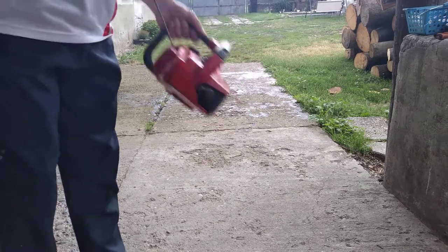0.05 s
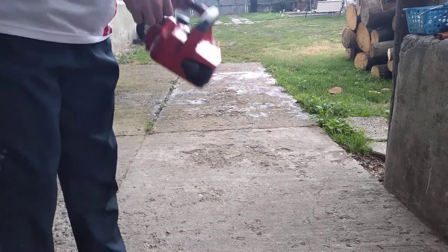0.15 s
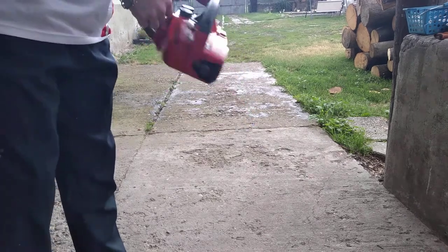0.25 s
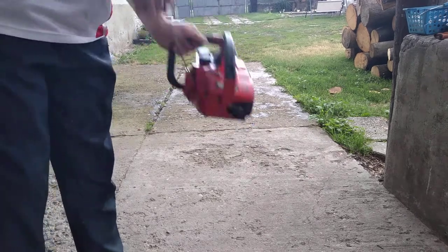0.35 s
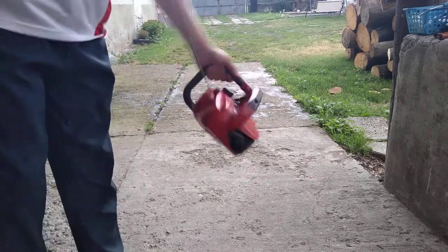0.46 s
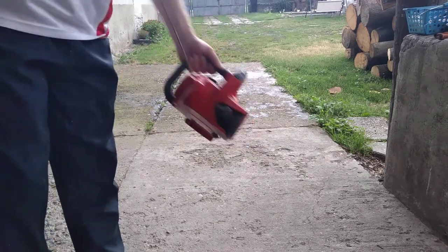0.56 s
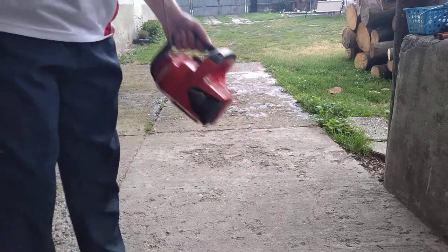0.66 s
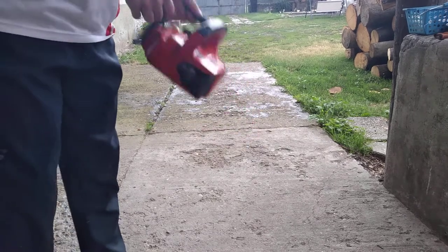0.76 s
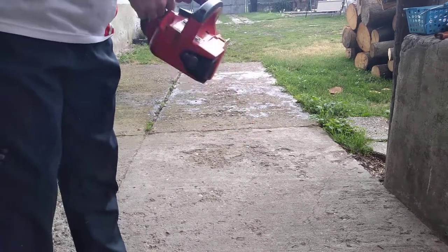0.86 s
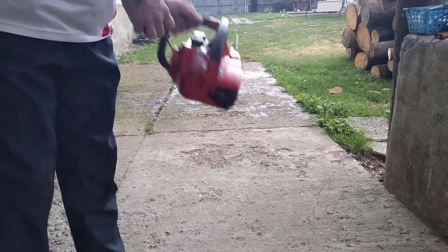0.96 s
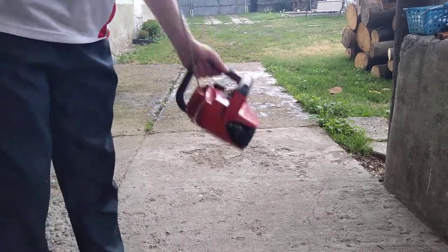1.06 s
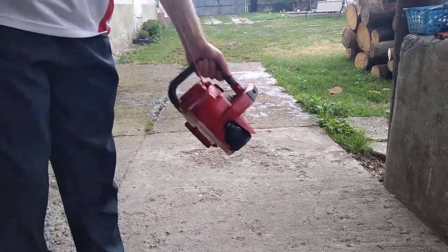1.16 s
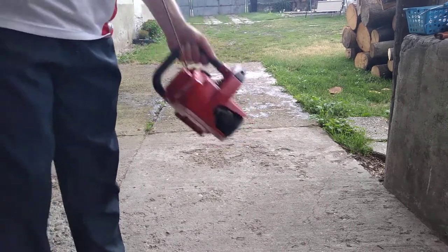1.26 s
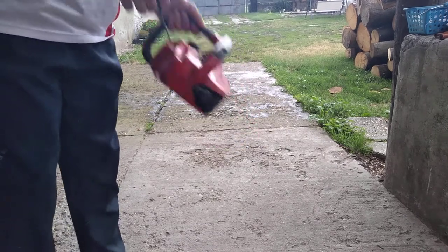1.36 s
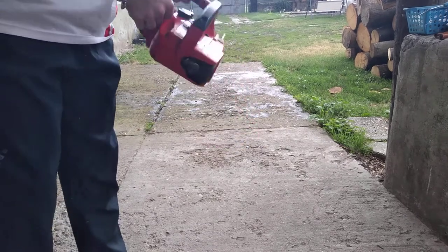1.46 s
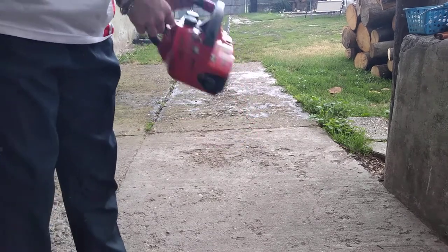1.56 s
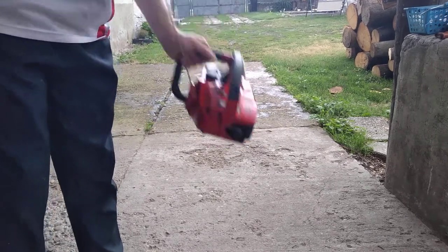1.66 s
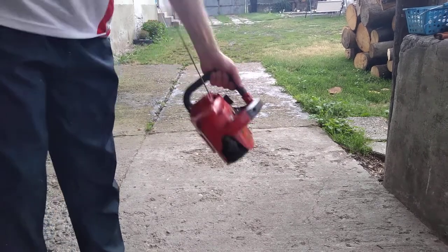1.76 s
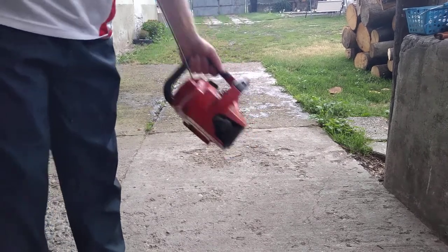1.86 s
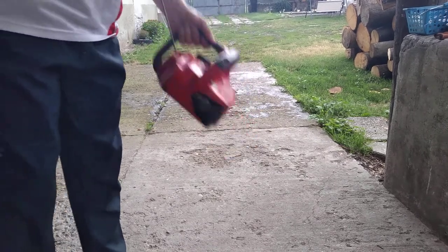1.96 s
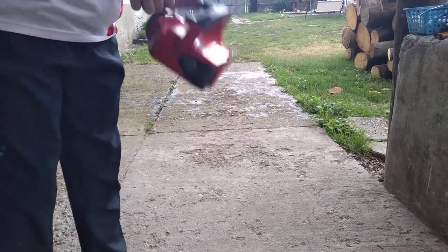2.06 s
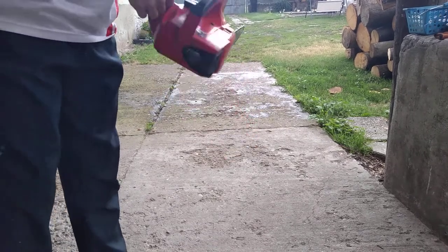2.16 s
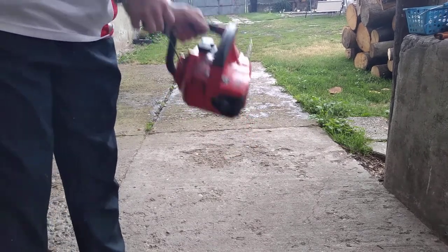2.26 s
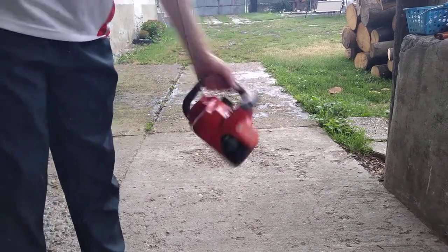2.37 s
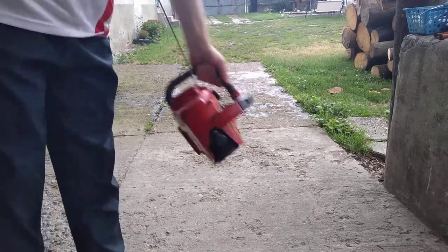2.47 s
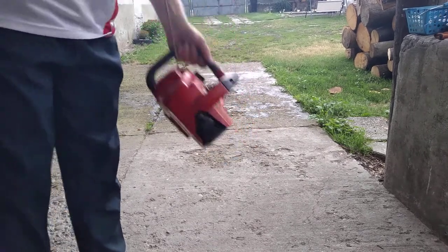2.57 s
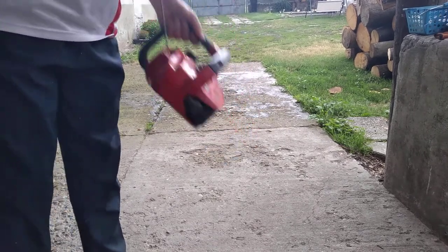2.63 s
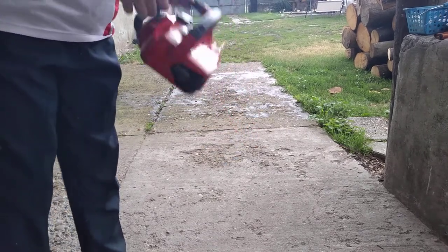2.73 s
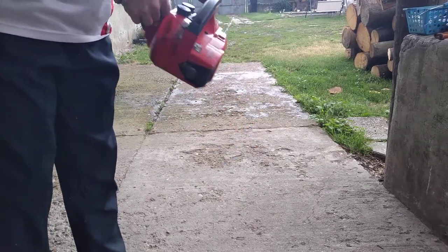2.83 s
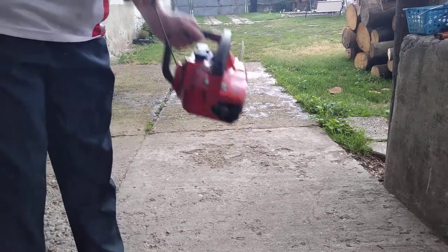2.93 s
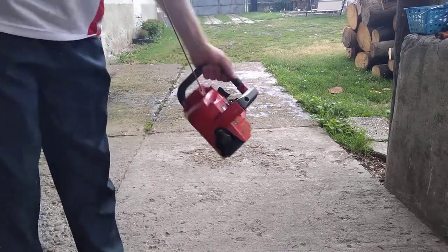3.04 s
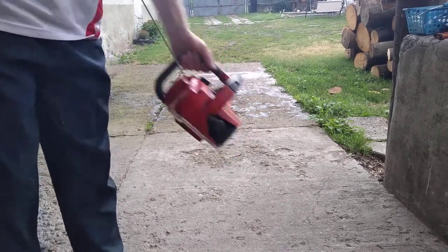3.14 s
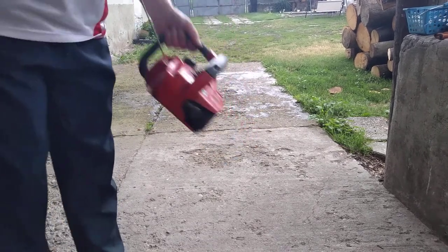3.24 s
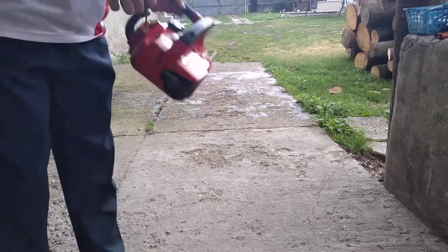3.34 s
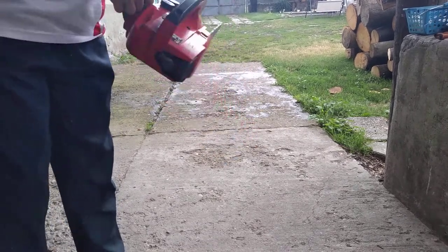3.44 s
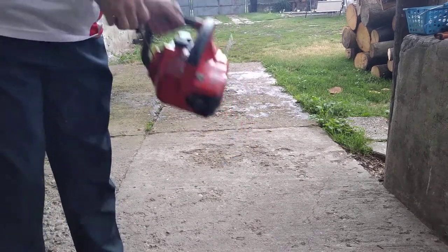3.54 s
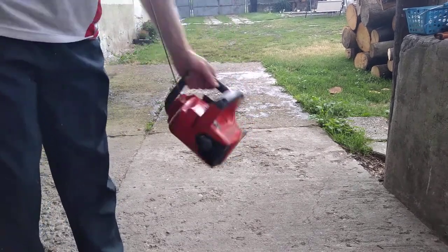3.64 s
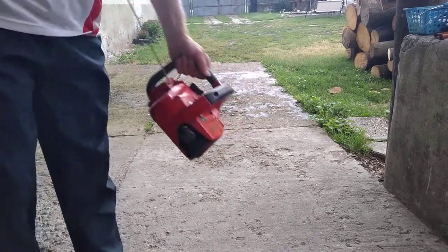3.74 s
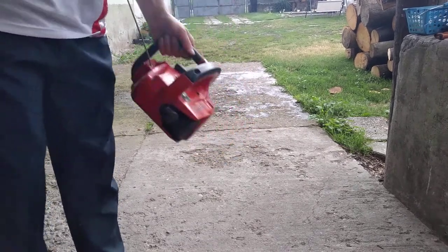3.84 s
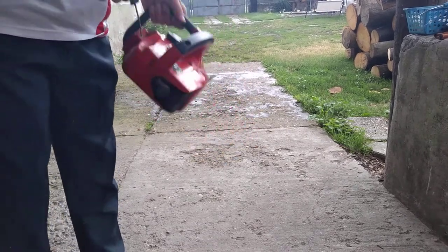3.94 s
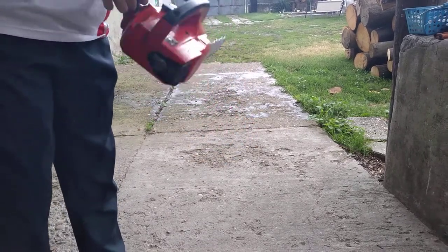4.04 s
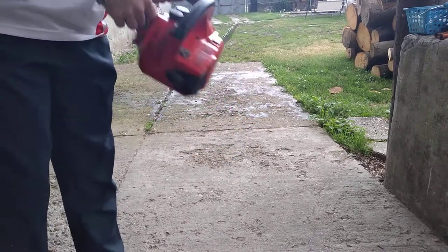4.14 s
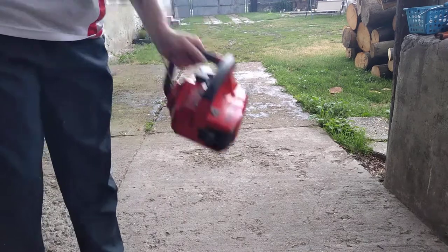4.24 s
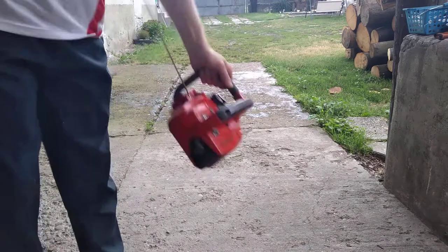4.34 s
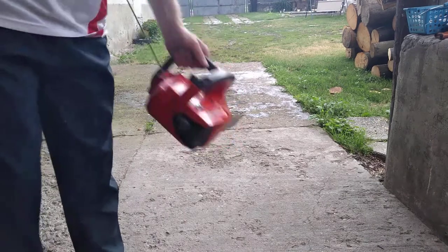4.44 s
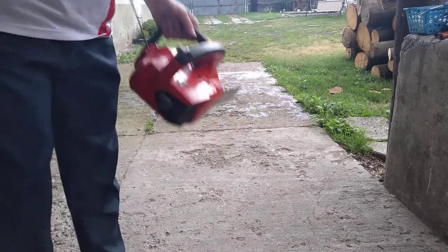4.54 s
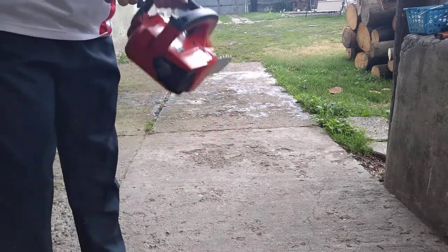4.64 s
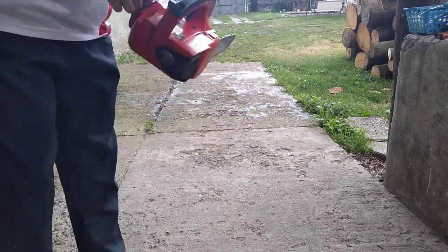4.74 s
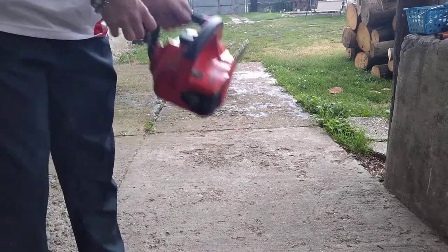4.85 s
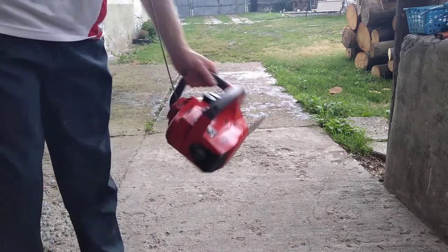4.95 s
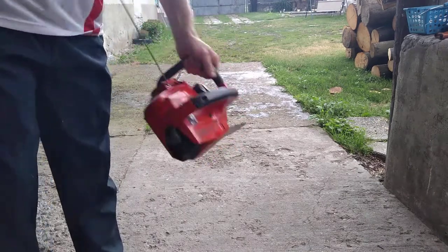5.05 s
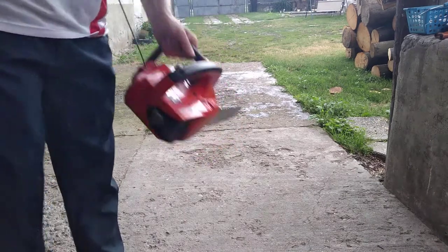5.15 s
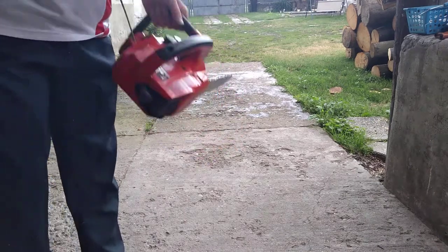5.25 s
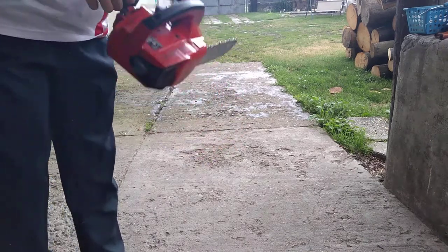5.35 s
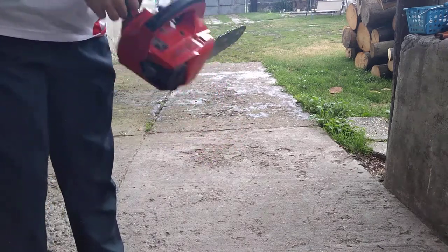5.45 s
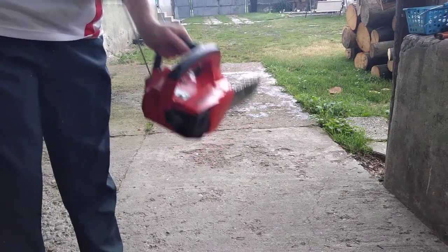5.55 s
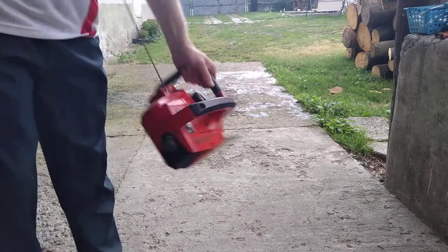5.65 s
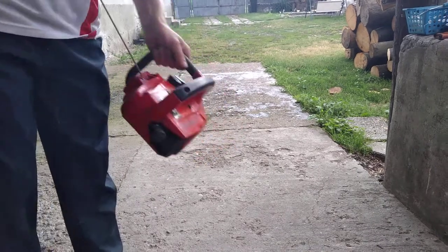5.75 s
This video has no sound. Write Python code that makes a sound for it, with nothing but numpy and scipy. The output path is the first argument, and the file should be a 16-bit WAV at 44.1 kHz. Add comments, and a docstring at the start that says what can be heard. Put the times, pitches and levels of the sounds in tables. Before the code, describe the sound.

A small two-stroke chainsaw is pull-started nine times in quick, even succession and never fires. Each pull begins with a sharp click, then a short run of dull engine puffs with loose metal clattering. After most pulls the cord winds back with a bright rasp and small spring chirps. The handle knocks now and then as the saw swings. It is heard close, in wide stereo, in a quiet yard with a short echo.

```python
"""A small two-stroke chainsaw is drop-started nine times over a concrete yard and never fires.
On each pull the starter pawls snap in, the piston puffs through the muffler and loose metal clatters.
After most pulls the recoil spring winds the cord back with a bright rasp and chirps of slipping coils.
The handle knocks as the saw swings. The yard adds a short tail, and the stereo image is widened."""
import sys
import numpy as np
from scipy import signal
from scipy.fft import rfft, irfft
from scipy.io import wavfile

SR = 44100
rng = np.random.default_rng(int(sys.argv[2]) if len(sys.argv) > 2 else 0)


def dump(signal):
    """Clip the signal to [-1, 1] and save it as 16-bit WAV at the path in sys.argv[1]."""
    limited = np.clip(np.atleast_2d(signal).T, -1, 1)
    pcm = np.round(limited * 32767).astype(np.int16)
    wavfile.write(sys.argv[1], SR, pcm)


N = 255780
TIME = np.arange(N) / SR

# the spring winds the cord back:
# (start [s], fastest [s], stop [s], rasp [dB], housing rattle [dB], coil slips [dB])
REWINDS = [(-0.05, 0.002, 0.15, -38, -41, -39), (0.727, 0.78, 0.77, -44, -55.5, -39),
           (1.19, 1.375, 1.414, -35, -41, -36), (1.806, 1.94, 2.106, -36, -36.5, -32),
           (2.469, 2.662, 2.75, -39.5, -42.5, -38), (3.115, 3.201, 3.38, -35.5, -38, -36),
           (3.871, 3.928, 4.03, -48, -46.5, -37), (5.254, 5.293, 5.37, -45, -53, -36.5),
           (5.773, 5.8, 6, -40, -31.5, -38)]
# accented slips of the spring's coils: (time [s], level [dB])
SLIP_ACCENTS = [(0.168, -26.5), (0.7324, -40), (0.7672, -32.5), (1.2725, -41), (1.3069, -22), (2.111, -36),
                (2.6723, -20.5), (3.318, -25), (3.3787, -29), (4.0077, -28), (4.034, -29.5),
                (5.2121, -31.5)]
# knocks that shake the housing: (time [s], level [dB]); most are the handle as the saw swings, # the one at
# 4.903 s is the pawls biting on the eighth pull
HANDLE_KNOCKS = [(0.199, -24), (1.441, -20.5), (1.654, -21), (3.592, -35), (4.602, -22), (4.709, -30.5),
                 (4.903, -27.5), (5.179, -19), (5.55, -23.5), (5.573, -26)]
# starter pawls catch the flywheel: (time [s], level [dB])
PAWL_CATCHES = [(0.317, -29.5), (0.962, -33.5), (1.605, -24), (2.247, -30.5), (2.909, -27.5),
                (3.554, -19.5), (4.207, -24.5), (4.926, -21), (5.51, -29)]
# each pull spins the crank: (first puff [s], puffs [count, rounded], base turn length [s],
# extra for the stiff first turn [s], slowing [s per turn squared], first puff [dB], middle puff [dB],
# last puff [dB], air rumble [dB re puff levels], housing rattle [dB re puff levels])
PULLS = [(0.393, 8.37, 0.028, 0.0023, 0.00071, -13.5, -21.5, -19.5, -19, -18),
         (1.041, 4.96, .0348, 0.0073, .0047, -14, -16, -22.5, -19, -19),
         (1.686, 3, 0.037, 0.00044, 0.0017, -10.5, -11, -19, -19, -20),
         (2.299, 5.36, .0337, .013, .0018, -13.5, -9.5, -25.5, -18, -21),
         (2.986, 3.93, 0.026, 0.01, 0.012, -11, -12.5, -26.5, -18, -18.5),
         (3.608, 7, .0258, .0083, .00085, -9.5, -20.5, -19, -18.5, -21),
         (4.279, 9.42, .0272, .0031, .0004, -15, -21.5, -19.5, -19, -19.5),
         (4.931, 7.48, 0.031, 0, 0.00028, -18, -22.5, -21.5, -16, -34),
         (5.584, 5.8, 0.027, 0.01, .0016, -14.5, -17, -21.5, -20, -19)]
# loose metal clacks, like chain on bar: (time [s], level [dB])
METAL_CLACKS = [(0.426, -21.5), (0.5584, -28), (0.6394, -29), (1.0977, -28.5), (1.122, -28.5),
                (1.1644, -25.5), (1.7465, -22.5), (1.805, -29), (2.2957, -35.5), (2.3984, -23.5),
                (2.461, -31), (2.5671, -35), (3.046, -23.5), (3.641, -22), (3.7678, -24.5), (4.3082, -22),
                (4.3929, -37), (4.466, -28.5), (4.5353, -37), (4.57, -32), (4.765, -39.5), (4.9472, -25),
                (4.9902, -26), (5.0591, -29.5), (5.636, -28), (5.6525, -22.5), (5.76, -30.5)]

# plastic starter housing: (frequency [Hz], width [Hz], gain [dB])
HOUSING_MODES = [(573.4, 31, 4.5), (613.5, 42, 4), (743, 74, -1.5), (861, 17, -4), (980, 31, -29),
                 (1316, 68, -8.5), (1730, 67, -23), (2410, 59, -13.5), (3155, 53, -16.5), (3900, 42, -30)]
# steel recoil spring: (frequency [Hz], width [Hz], gain [dB])
SPRING_MODES = [(2650, 160, -0.5), (3090, 265, 3.5), (3924, 87, 11.5), (4500, 22, 11), (4684, 33, 12),
                (4950, 18, 8.5), (5130, 25, -2), (5561, 11, 14.5), (6440, 470, 12), (6900, 160, 8.5),
                (9930, 50, 6.5), (11000, 50, -1.5), (12100, 46, -2), (12700, 38, 7)]
# muffler and crankcase cavities: (frequency [Hz], width [Hz], gain [dB])
MUFFLER_MODES = [(85.8, 20, 9), (169.3, 11.4, 11), (235.7, 22.6, 5), (317.5, 7.6, 7), (366.2, 10, 7),
                 (389.4, 18, 2.5), (400, 17, -11.5), (550, 5.5, -9), (610, 4.7, -7), (734, 43, -39),
                 (1050, 56, -27), (1400, 62, -27)]
# chain and guide bar: (frequency [Hz], width [Hz], gain [dB])
CHAIN_MODES = [(2520, 200, 0), (3240, 210, -10.5), (4890, 120, 5.5), (5223, 44, 3.5), (5800, 220, -13),
               (7800, 230, -16), (9790, 93, 4.5), (10470, 120, 0), (11300, 120, -3), (12130, 160, 9.5),
               (13320, 170, 4.5)]

# hiss of scraping cord and coils: (frequency [Hz], gain [dB])
SCRAPE_EQ = [(300, -3.5), (600, 6), (1500, 4), (2300, -1), (5000, -0.5), (8500, -4), (12000, -3),
             (14500, 3)]
# dull breath of air pumped by the piston: (frequency [Hz], gain [dB])
AIR_EQ = [(40, -16), (90, 6.5), (400, 2), (1300, 1.5), (2000, -2), (3300, -18.5), (6000, -33.5),
          (14000, -23)]
# tone of a metal clack: (frequency [Hz], gain [dB])
CLACK_EQ = [(200, -18.5), (600, 22.5), (1400, -15), (2200, -2.5), (3600, 8), (4400, 8.5), (5100, 2.5),
            (6100, 4.5), (8500, 5.5), (10500, 3), (12000, 13), (14500, -28)]
# low ambience bed of the yard: (frequency [Hz], gain [dB])
AMBIENCE_EQ = [(30, 31), (120, 41), (300, 1), (700, -31), (2000, -17), (6000, -23), (14000, -75)]
# stereo width of a close microphone pair: (frequency [Hz], side gain [dB])
SIDE_EQ = [(60, -21.5), (200, -10), (500, -9), (1000, -3), (2100, -6), (3200, -2), (14000, 0.5)]


def from_db(db):
    return 10 ** (np.asarray(db) / 20)


def unit_rms(x):
    return x / np.sqrt(np.mean(x ** 2) + 1e-20)


def noise():
    return rng.standard_normal((2, N))


def convolve(x, response):
    return signal.fftconvolve(np.atleast_2d(x), np.atleast_2d(response), axes=1)[:, :N]


def butter(x, order, hz, band):
    return signal.sosfilt(signal.butter(order, hz, band, fs=SR, output="sos"), x)


def eq(x, curve, size=2048):
    """Minimum-phase EQ through the points of a curve."""
    hz, db = np.transpose(curve)
    bins = np.maximum(np.fft.rfftfreq(size, 1 / SR), 1)
    gain = from_db(np.interp(np.log(bins), np.log(hz), db))
    cepstrum = irfft(np.log(gain))
    cepstrum[1:size // 2] *= 2
    cepstrum[size // 2 + 1:] = 0
    return convolve(x, irfft(np.exp(rfft(cepstrum))))


def resonate(x, modes):
    """Parallel resonances, with hollows between them."""
    out = 0
    for hz, width, db in modes:
        r = np.exp(-np.pi * width / SR)
        zeros = [(1 - r * r) / 2, 0, (r * r - 1) / 2]
        poles = [1, -2 * r * np.cos(2 * np.pi * hz / SR), r * r]
        out = out + from_db(db) * signal.lfilter(zeros, poles, x + 1e-18)
    return out


def impulses(cues):
    """One click per cue (time [s], level [dB])."""
    out = np.zeros(N)
    for s, db in cues:
        out[int(np.clip(s * SR, 0, N - 1))] += from_db(db)
    return out


def bursts(clicks, rise_s, fall_s):
    """Every click triggers an attack-decay envelope."""
    t = TIME[:SR // 4]
    shape = (1 - np.exp(-t / rise_s)) * np.exp(-t / fall_s)
    return np.abs(convolve(clicks, shape / shape.max()))


def fader(times, levels_db, rise_db_per_s, fall_db_per_s):
    """Gain that fades in to the first level, rides through the others and fades out after the last."""
    early, late = np.maximum(times[0] - TIME, 0), np.maximum(TIME - times[-1], 0)
    db = np.interp(TIME, times, levels_db) - rise_db_per_s * early - fall_db_per_s * late
    return from_db(np.maximum(db, -200))


def grains(per_s, spread_db):
    """Grit of tiny random contacts, each with its own strength left and right."""
    sizes = from_db(spread_db * np.minimum(rng.exponential(1, N), 4))
    return unit_rms((rng.random(N) < per_s / SR) * sizes * noise())


def chatter(per_s, jitter, fall_s, rub):
    """Envelope of a part that knocks almost regularly over a steady rub."""
    times = np.cumsum(np.exp(jitter * rng.standard_normal(2000)) / per_s)
    levels_db = rng.normal(0, 3, 2000)
    knocks = np.column_stack([times, levels_db])[times < TIME[-1]]
    return unit_rms(rub + bursts(impulses(knocks), 0.0003, fall_s))


def recoil(rattle_db=-3, spring_db=2, scrape_db=-1):
    """The pulley rattles in its housing; the spring rings while its coils scrape over each other."""
    rattle, rasp = pulley_envelopes()
    knocking = chatter(per_s=95, jitter=0.33, fall_s=0.005, rub=0.58)
    housing = unit_rms(housing_ring(knocking * grains(4000, 3.5)))
    spring = from_db(spring_db) * unit_rms(resonate(knocking * grains(4000, 1.6), SPRING_MODES))
    friction = chatter(per_s=190, jitter=0.47, fall_s=0.00075, rub=1) * grains(7000, 1.6)
    scrape = from_db(scrape_db) * shifting_coils(eq(friction, SCRAPE_EQ))
    return from_db(rattle_db) * rattle * housing + rasp * (spring + scrape)


def pulley_envelopes(gather_db_per_s=63, slacken_db_per_s=46.5, rise_db_per_s=505, rattle_follows=0.58):
    """Housing rattle and spring rasp: mostly rattle on the pull; both swell and fade on the rewind."""
    rattle, rasp = from_db(-69), from_db(-76)   # the swinging saw is never quite still
    rattle = rattle + from_db(-19) * take_up() + from_db(-27) * cord_twitches()
    for pull in PULLS:
        *_, rattle_db = pull
        drive = effort(pull, coast_db_per_s=125)
        rattle = rattle + from_db(rattle_db) * drive
        rasp = rasp + from_db(-44) * drive
    for start, fastest, stop, rasp_db, rattle_db, _ in REWINDS:
        span = [start, fastest, stop]
        swell_db = -np.array([gather_db_per_s * (fastest - start), 0, slacken_db_per_s * (stop - fastest)])
        shake = fader(span, rattle_db + rattle_follows * swell_db, rise_db_per_s, fall_db_per_s=193)
        winding = fader(span, rasp_db + swell_db, rise_db_per_s, fall_db_per_s=330)
        quiver = fader(span, rasp_db + swell_db - 21, rise_db_per_s, fall_db_per_s=130)   # spring tail
        rattle = np.maximum(rattle, shake)
        rasp = np.maximum(rasp, np.maximum(winding, quiver))
    return rattle, rasp


def housing_ring(x, low_cut_hz=430):
    """The small plastic shell rings, radiating little below its first modes."""
    return butter(resonate(x, HOUSING_MODES), 2, low_cut_hz, "high")


def shifting_coils(x, trip_s=0.0031, wander=0.031, echo_gain=0.47):
    """Vibration runs up and down the free length of spring; that length changes, so resonances glide."""
    drift = np.interp(TIME, np.linspace(0, TIME[-1], 60), rng.standard_normal(60))
    delay = trip_s * SR * (1 + wander * drift)
    n = np.arange(N)
    combed = [sum(echo_gain ** k * np.interp(n - k * delay, n, channel) for k in range(4))
              for channel in x]
    return unit_rms(np.array(combed))


def coil_slips(chirp_db=-9, scrape_db=-15, high_hz=6900, low_hz=3000, width_hz=260):
    """A slipping coil scrapes and chirps on two modes; tighter and looser coils differ in pitch."""
    chirps, cues = 0, slip_cues()
    for k, tightness in enumerate([0.938, 1.04, 0.97, 1.015]):
        envelope = bursts(impulses(cues[k::4]), 0.0015, 0.004)
        modes = [(high_hz * tightness, width_hz, 0), (low_hz * tightness, width_hz, -5)]
        chirps = chirps + envelope * unit_rms(resonate(noise(), modes))
    scrape = bursts(impulses(cues), 0.00084, 0.0019) * unit_rms(eq(noise(), SCRAPE_EQ))
    return from_db(chirp_db) * chirps + from_db(scrape_db) * scrape


def slip_cues(gap_s=0.0275, jitter_s=0.0022, spread_db=7.5):
    """The accents plus an uneven run of slips through each rewind: (time [s], level [dB])."""
    cues = list(SLIP_ACCENTS)
    for start, stop, *_, slip_db in REWINDS:
        chance = rng.standard_normal((40, 2))
        for s, (late, strong) in zip(np.arange(start, stop, gap_s), chance):
            cues.append((s + jitter_s * late, slip_db + spread_db * strong))
    return [(s, db) for s, db in cues if 0 < s < TIME[-1]]


def knocks_and_pawls(knock_db=8, snap_db=12, crack_db=-12):
    """The handle knocks and the pawls bite with a crack; both shake the housing."""
    snaps = bursts(impulses(PAWL_CATCHES), 0.0011, 0.0067) * grains(6000, 1.0)
    knocks = bursts(impulses(HANDLE_KNOCKS), 0.0016, 0.0022) * grains(5000, 3.9)
    crack = from_db(crack_db) * resonate(snaps, [(1140, 340, 17), (3480, 270, 1), (4330, 50, 5)])
    return housing_ring(from_db(snap_db) * snaps + from_db(knock_db) * knocks) + crack


def cord_twitches(rise_s=0.00084, fall_s=0.0053):
    """Envelope of brief stirs of the cord, placed on the pawl cues mirrored end to end in time."""
    return bursts(impulses(PAWL_CATCHES)[::-1], rise_s, fall_s)


def take_up(rise_s=0.0073, fall_s=0.076):
    """After the pawls catch, the cord tightens and drags the piston towards its first compression."""
    return bursts(impulses(PAWL_CATCHES), rise_s, fall_s)


def piston_air(rumble_db=-1, breath_db=-8, leak_db=-22, gasp_db=-19):
    """The piston pumps air through the cavities, with a short leak and a longer gasp on each turn."""
    clicks = strokes()
    pumping = bursts(clicks, 0.0011, 0.0043)
    drive = from_db(-27) * take_up() + from_db(-21) * pumping
    for pull in PULLS:
        *_, air_db, _ = pull
        drive = drive + from_db(air_db) * effort(pull, coast_db_per_s=153)
    rumble = from_db(rumble_db) * drive * unit_rms(resonate(noise(), MUFFLER_MODES))
    leak = bursts(clicks[::-1], 0.00033, 0.002)[:, ::-1]   # reverse swell as compression builds
    gasp = bursts(clicks, 0.0026, 0.003)
    air = from_db(breath_db) * drive + from_db(leak_db) * leak + from_db(gasp_db) * gasp
    return rumble + air * unit_rms(eq(noise(), AIR_EQ))


def turns(pull):
    """Times and levels of one pull's puffs: a stiff first turn, then a crank that gradually slows."""
    start, count, base_s, stiff_s, slowing_s, *levels_db, _, _ = pull
    k = np.arange(round(count) - 1)
    lengths = base_s + stiff_s * (k == 0) + slowing_s * k ** 2
    times = start + np.append(0, np.cumsum(lengths))
    return times, np.interp(np.linspace(0, 1, len(times)), [0, 0.5, 1], levels_db)


def strokes():
    """One click per turn of the crank."""
    return sum(impulses(zip(*turns(pull))) for pull in PULLS)


def effort(pull, coast_db_per_s, spin_up_db_per_s=656):
    """How hard the crank is driven: as strong as its puffs, then coasting to rest."""
    return fader(*turns(pull), spin_up_db_per_s, coast_db_per_s)


def exhaust(swell_s=0.0005, suck_s=0.00096, swing_s=0.002232, edge_hz=1550, puff_db=2, ring_db=-3.5):
    """Pressure swells and snaps to suction as the port opens on the unfired cylinder; the muffler rings."""
    t = (np.arange(SR // 25) - SR // 50) / SR
    swell = np.exp(-abs(t) / swell_s)
    suction = -from_db(-5) * np.exp(-abs(t) / suck_s)
    wave = np.where(t < 0, swell, suction)
    wave = wave - from_db(-8.5) * np.interp(t - swing_s, t, wave)   # the gas swings back once
    wave = signal.sosfiltfilt(signal.butter(3, edge_hz, fs=SR, output="sos"), wave)
    puffs = signal.fftconvolve(strokes(), wave, "same")
    return from_db(puff_db) * puffs + from_db(ring_db) * resonate(puffs, MUFFLER_MODES)


def metal_clacks(hit_db=-9, shimmer_db=-23, chain_db=-6, jolt_db=-11):
    """Tight clusters of metal contacts set chain and bar ringing; the pawls jolt them too."""
    hits = impulses(METAL_CLACKS) + from_db(jolt_db) * impulses(PAWL_CATCHES)
    contacts = bursts(hits, 0.0009, 0.0063) * grains(7000, 0.44)
    shimmer = bursts(hits, 0.004, 0.013) * noise()
    chain = from_db(chain_db) * resonate(contacts + shimmer, CHAIN_MODES)
    return eq(from_db(hit_db) * contacts + from_db(shimmer_db) * shimmer, CLACK_EQ) + chain


def yard_reverb(x, predelay_s=0.0016, split_hz=2500, low_t60_s=0.72, high_t60_s=0.27):
    """Ground and nearby walls scatter a short tail whose treble dies first."""
    t = TIME[:SR // 2]
    scatter = rng.standard_normal((2, len(t))) * np.clip(t / predelay_s - 1, 0, 1)
    response = 0
    for band, t60, wet_db in (("low", low_t60_s, -10.5), ("high", high_t60_s, -9)):
        tail = scatter * from_db(-60 * t / t60)
        tail = from_db(wet_db) * tail / np.sqrt(np.sum(tail ** 2) / 2)
        response = response + butter(tail, 3, split_hz, band)
    return convolve(x, response)


def scene(ambience_db=-70):
    """The saw over the yard's ambience, on a close microphone pair: narrow bass, wide treble."""
    saw = exhaust() + piston_air() + knocks_and_pawls() + metal_clacks() + recoil() + coil_slips()
    left, right = saw + yard_reverb(saw) + from_db(ambience_db) * unit_rms(eq(noise(), AMBIENCE_EQ))
    mid, side = (left + right) / 2, eq((left - right) / 2, SIDE_EQ)
    return mid + side * [[1], [-1]]


def record(dry, cross=0.7, cross_top_hz=7800, lag_samples=21, low_cut_hz=70, stop_hz=15300, gain_db=-1):
    """Stereo widening feeds each channel, late and inverted, into the other; the left is brighter."""
    dry = butter(dry, 2, low_cut_hz, "high")
    hz = np.fft.rfftfreq(N, 1 / SR)
    swapped = np.pad(dry[::-1], ((0, 0), (lag_samples, 0)))[:, :N]
    crossfeed = irfft(rfft(swapped) * cross / (1 + (hz / cross_top_hz) ** 4), N)
    left, right = dry - crossfeed
    left = eq(left, [(300, 1), (1500, 0.17), (9000, 0), (12500, 4)])[0]
    high_cut = signal.cheby2(14, 70, stop_hz, fs=SR, output="sos")
    return signal.sosfilt(high_cut, from_db(gain_db) * np.array([left, right]))


dry = scene()
out = record(dry)
dump(out)
```